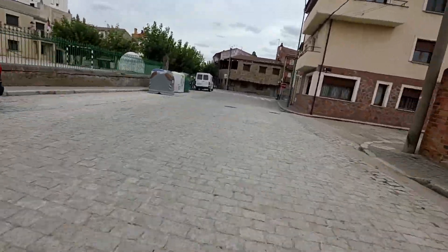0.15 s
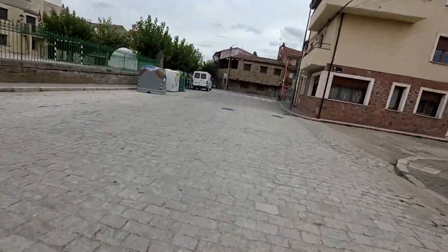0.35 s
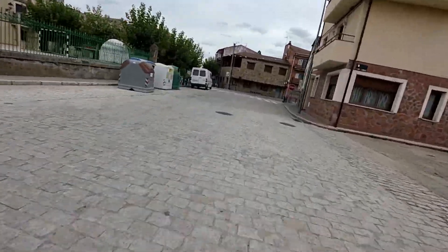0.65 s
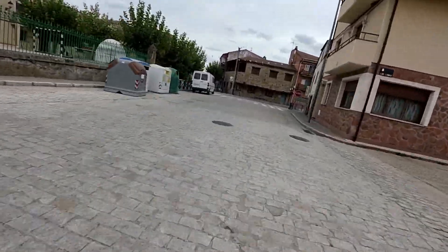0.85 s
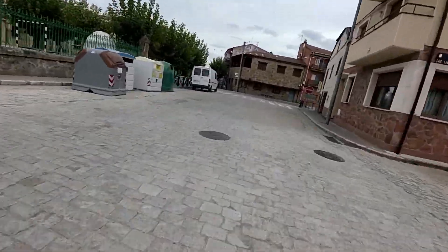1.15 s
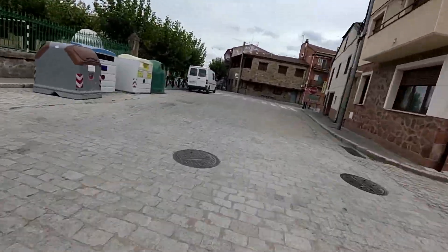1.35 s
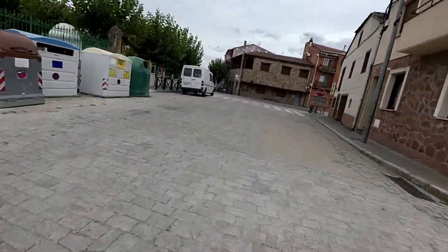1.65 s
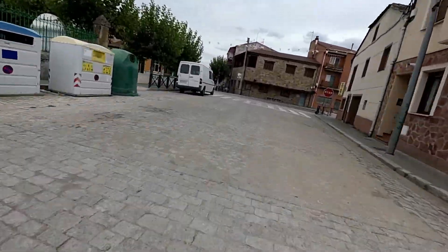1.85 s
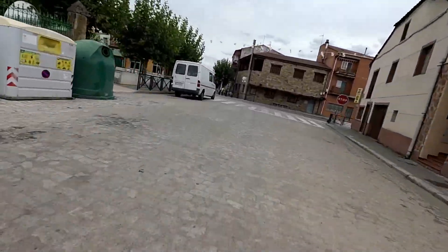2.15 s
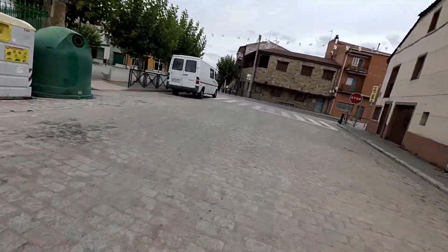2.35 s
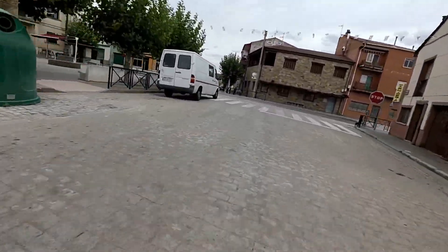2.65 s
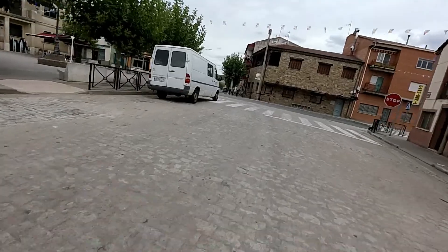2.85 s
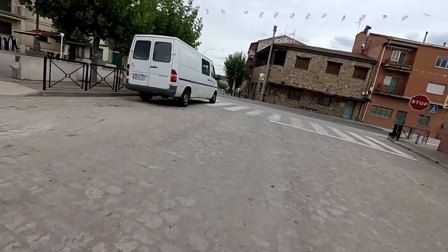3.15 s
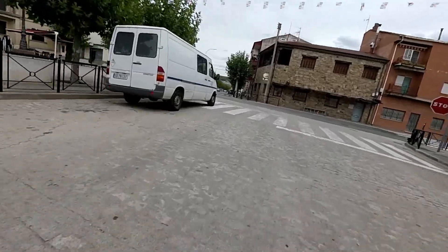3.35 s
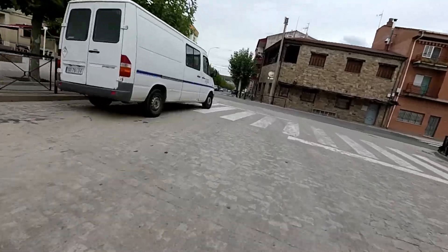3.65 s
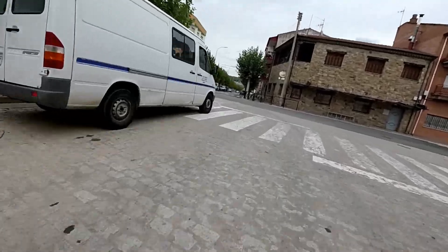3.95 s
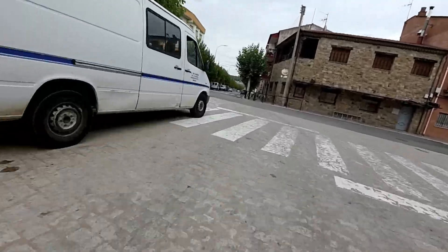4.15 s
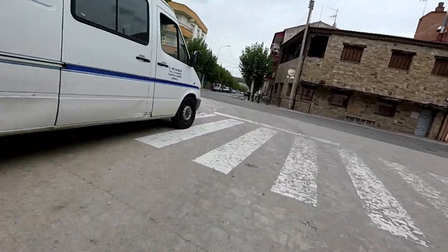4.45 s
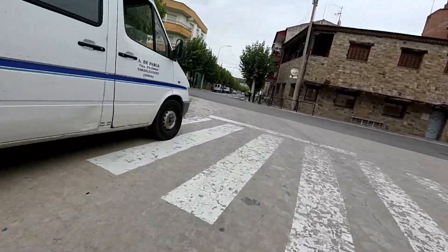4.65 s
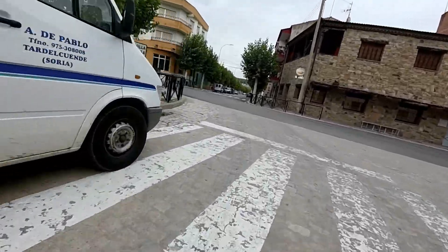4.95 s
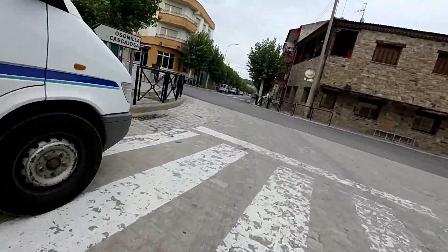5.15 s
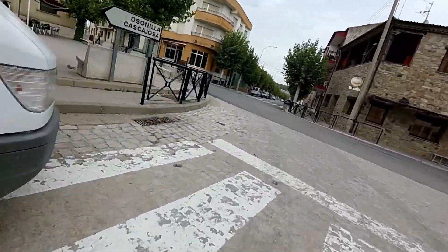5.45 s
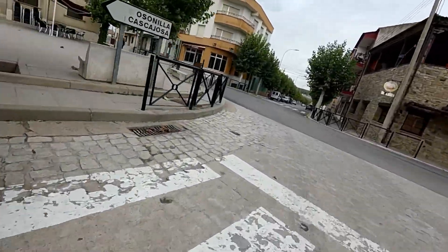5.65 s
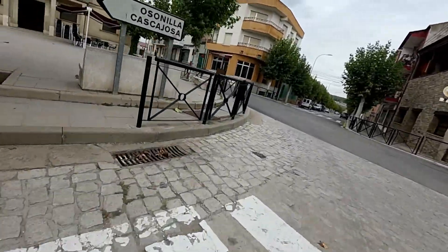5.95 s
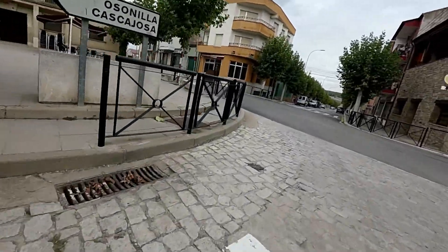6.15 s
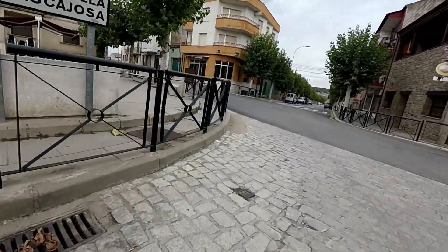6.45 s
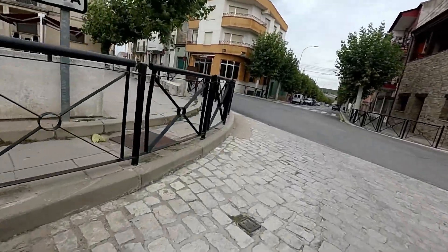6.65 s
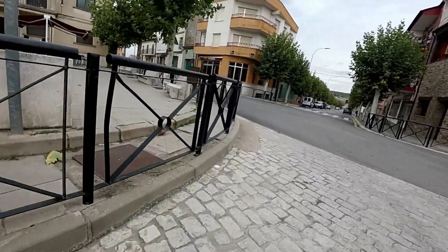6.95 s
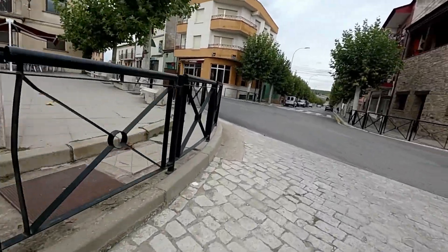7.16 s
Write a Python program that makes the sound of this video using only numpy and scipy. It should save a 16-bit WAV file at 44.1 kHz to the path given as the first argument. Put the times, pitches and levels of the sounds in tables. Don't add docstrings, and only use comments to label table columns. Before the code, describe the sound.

A bicycle rattles over cobblestones with wind rush, tyre hiss and freewheel clicking; hard knocks and a brief creak, then it slows and quietens.

```python
import sys
import numpy as np
from scipy import signal
from scipy.fft import rfft, irfft, next_fast_len
from scipy.io import wavfile
from scipy.ndimage import uniform_filter1d, map_coordinates

SR = 44100
rng = np.random.default_rng(int(sys.argv[2]) if len(sys.argv) > 2 else 0)


def natural_amplitude(level_db):
    exponent = np.asarray(level_db, float) / 20
    return 10 ** exponent


def int16_out(signal):
    q = np.round(np.clip(np.atleast_2d(signal).T, -1, 1) * 32767)
    wavfile.write(sys.argv[1], SR, q.astype(np.int16))


N = 322017

# pitch in Hz, width in Hz, level in dB.
TUBES = [(265.6, 36.8, 2), (319.6, 39.7, 0.5), (383.4, 53, -9), (449, 30, -13), (640, 70, -14)]


def unit(x):
    return x / np.sqrt(np.mean(x ** 2) + 1e-20)


def curves(rows):
    s, *cols = np.transpose(rows)
    return [np.interp(np.arange(N) / SR, s, c) for c in cols]


def swells(rows, half_s):
    s, *cols = np.transpose(rows)
    t = np.arange(0, N, 128) / SR
    bells = np.exp(-((t[:, None] - s) / half_s) ** 2 / 2)
    return [np.interp(np.arange(N) / SR, t, bells @ height) for height in cols]


def wobble(rate):
    return map_coordinates(rng.standard_normal(int(N * rate / SR) + 4), [np.arange(N) * rate / SR])


def filtered(x, response):
    m = next_fast_len(len(x) + min(len(x), 8192))
    return irfft(rfft(x, m) * response(np.fft.rfftfreq(m, 1 / SR)), m)[:len(x)]


def modes(table):
    def response(f):
        total = 0
        for k, (hz, width, db) in enumerate(table):
            total = total + (-1) ** k * natural_amplitude(db) * 1j * f * width / (hz * hz - f * f + 1j * f * width)
        return total
    return response


def damped(corner_hz, order):
    return lambda f: (1 + 1j * f / corner_hz) ** -order


def colour(points):
    hz, db = np.transpose(points)
    return lambda f: natural_amplitude(np.interp(np.log(f + 1), np.log(hz + 1), db))


def contacts(passed, scatter_db, rise_s, decay_s):
    starts = np.diff(np.floor(passed), prepend=0) * natural_amplitude(scatter_db * rng.standard_normal(N))
    t = np.arange(SR // 8) / SR
    pulse = np.exp(-t / decay_s) * (1 - np.exp(-t / rise_s))
    return unit(signal.fftconvolve(starts, pulse)[:N])


def ringing(drive, body, wide, steady_s):
    x = filtered(drive * rng.standard_normal(N), lambda f: modes(body)(f) * modes([wide])(f))
    loudness = np.sqrt(abs(uniform_filter1d(x ** 2, int(steady_s * SR))) + 1e-12)
    return unit(x / loudness ** 0.8)


def frame_rumble(jolts, slow_db):
    # pitch in Hz, width in Hz, level in dB.
    fork_body = [(68.85, 6.9, 0)]
    seat_body = [(93.3, 12, 11.5), (139, 190, -4)]
    stem_body = [(192.6, 26.3, 0)]
    # time in seconds, fork dB, seat dB.
    humps = [(0.0, 11.5, -3), (.14, -3, 6), (.26, 4.5, -7), (.95, -6, -2), (1.05, 7, -15), (1.16, 4.5, 2),
             (1.32, -6, 9), (1.42, 10, -3), (1.49, -8, 8), (1.66, 11.5, -1), (1.79, -4, 5), (1.93, 5, 0),
             (2.34, 5.5, 3), (2.56, 3.5, 4), (2.68, -14, -1), (2.77, 11.5, -3), (2.87, -13, 5),
             (3.78, 3, -5), (4.06, -10, 4), (4.14, 6.5, -3), (4.45, 5.5, 1), (4.56, 5, -1), (4.62, -9, 0),
             (6.16, 4, -3), (5.4, -10, 7), (5.59, -9, -2), (5.67, 5, -6), (6.49, 6, 0), (6.58, -16, 0),
             (6.82, 12.5, 4)]
    # time in seconds, tubes dB, stem dB.
    stone_edges = [(.02, 1.5, 3.5), (3.41, 0, 7), (.44, 3, 5), (.96, 3.5, 6.5), (1.05, 3.5, 6),
                   (1.16, -10, 6.5), (1.28, 4, -7), (1.48, -2, 8), (1.54, -2, -1), (1.66, 4, 3),
                   (1.79, 1, 5), (2.0, -1.5, -6), (2.18, 2, 9.5), (2.23, -1.5, -4), (2.48, 4, 0),
                   (2.62, -6, 0), (2.69, 4, -8), (3.05, 3, -4), (3.76, 4, 0), (4.0, 6.5, -0.5),
                   (4.13, -4, -9), (4.28, 1.5, 4), (4.63, 5.5, -6.5), (4.95, 4, -0.5), (5.37, -4, -1),
                   (5.43, 7, -5), (5.68, 4.5, 2.5), (6.0, 5, -4), (6.49, 4, -3), (6.89, 2.5, 12)]
    fork_db, seat_db = swells(humps, half_s=0.032)
    tubes_db, stem_db = swells(stone_edges, half_s=0.029)
    fork_db = -27 + 1.08 * slow_db + fork_db + 0.61 * wobble(12)
    seat_db = -35 + 2.06 * slow_db + seat_db + 3 * wobble(13)
    stem_db = -28 + 1.52 * slow_db + stem_db + 2.08 * wobble(15)
    tubes_db = -24 + 1.44 * slow_db + tubes_db + 0.67 * wobble(15)
    fork = natural_amplitude(fork_db) * ringing(1, fork_body, (68, 45, 0), 0.1)
    seat = natural_amplitude(seat_db) * ringing(1, seat_body, (120, 100, 0), 0.089)
    stem = natural_amplitude(stem_db) * ringing(1 + 0.12 * jolts, stem_body, (195, 120, 0), 0.078)
    tubes = natural_amplitude(tubes_db) * ringing(1 + 0.32 * jolts, TUBES, (320, 260, 0), 0.094)
    return filtered(fork + seat + stem + tubes, damped(1190, order=3)) * natural_amplitude(0.08)


def passing(slow_db):
    # time in seconds, half length in seconds, change
    # in dB.
    rush_swells = [(.1, .018, 3.5), (.39, .018, 4), (1.04, .04, 3), (1.42, .018, 4), (1.8, .2, 1.5),
                   (2.29, .015, 4), (2.71, .015, 9), (2.97, .06, -3), (3.11, .018, 5), (3.88, .02, 2.5),
                   (4.2, .12, -2.5), (4.86, .018, 4), (6.2, .1, 1.5)]
    # time in seconds, half length in seconds.
    skip = (2.62, 0.059)
    # time in seconds, half length in seconds, cavity dB, tyre dB.
    walls = [
        (.5, .2, 3.5, 1),
        (1.35, .2, -1.5, -1),
        (4.6, 0.27, 4, 1.5),
        (5.2, .2, 2.5, 1.5),
        (5.65, .15, 0, 2),
        (6.1, .3, 1.5, 0),
    ]
    swell_db, = swells(np.delete(rush_swells, 1, axis=1), np.transpose(rush_swells)[1])
    lull, = swells([(skip[0], 1)], skip[1])
    hollow_db, hiss_db = swells(np.delete(walls, 1, axis=1), np.transpose(walls)[1])
    wind_db = -30.5 + 1.28 * slow_db + swell_db - 3 * lull
    cavity_db = -41 + 0.089 * slow_db - 3 * lull + hollow_db
    tyre_db = -44.5 + 0.14 * slow_db - 2.6 * lull + hiss_db
    hub_db = -49.5 + 0.19 * slow_db - 4 * lull - 0.6 * hollow_db + 0.4 * swell_db
    return wind_db, cavity_db, tyre_db, hub_db


def freewheel(teeth):
    # pitch in Hz, width in Hz, level in dB.
    hub_bodies = [
        [(2430, 270, -4.5), (2770, 1050, -5.5)],
        [(3740, 700, 0.5), (4800, 380, 5.5), (7150, 640, -2.5), (10000, 500, -8), (11600, 500, -24)],
    ]
    parts = []
    for body in hub_bodies:
        clicks = contacts(teeth, scatter_db=2.5, rise_s=0.0012, decay_s=0.0055) * rng.standard_normal(N)
        rung = filtered(filtered(clicks, modes(body)), damped(8000, order=4))
        parts.append(unit(rung))
    flange, ring = parts
    return natural_amplitude(-1) * flange + ring


def rush(jolts, teeth, slow_db):
    # pitch in Hz, level in dB per Hz.
    wind_colour = [(15, -23), (30, -15), (45, -7), (150, -13), (400, -7.5), (500, -13.5), (650, -13),
                   (850, -16), (1150, -15.5), (1700, -26), (2100, -32), (2800, -43), (4400, -120)]
    hiss_colour = [(4000, -43), (6000, 1), (8600, -8.5), (9200, -10), (10000, -6.5), (10800, -10.5),
                   (11800, -9.5), (13000, -13), (15200, -14)]
    # pitch in Hz, width in Hz, level in dB.
    cavity_body = [(1353, 144, -1.5), (1477, 153, 1)]
    housing_body = [(2083, 1140, -5), (3390, 1530, -4), (3960, 227, 3.5), (4560, 490, -3), (5700, 1300, -7),
                    (7260, 300, -6), (8130, 280, -12.5)]
    wind_db, cavity_db, tyre_db, hub_db = passing(slow_db)
    gust = (1 + 0.079 * jolts) * natural_amplitude(0.67 * wobble(10))
    wind = natural_amplitude(wind_db) * unit(filtered(gust * rng.standard_normal(N), colour(wind_colour)))
    blown = filtered((1 + 0.19 * jolts) * rng.standard_normal(N), modes(cavity_body))
    cavity = natural_amplitude(cavity_db) * unit(filtered(blown, damped(3000, order=3)))
    shake = (1 + 0.095 * jolts) * natural_amplitude(0.91 * wobble(11))
    shaken = filtered(shake * rng.standard_normal(N), modes(housing_body))
    tyres = natural_amplitude(tyre_db) * unit(filtered(shaken, damped(11000, order=4)))
    floor = natural_amplitude(-59.5) * unit(filtered(rng.standard_normal(N), colour(hiss_colour)))
    return wind + cavity + tyres + natural_amplitude(hub_db) * freewheel(teeth) + floor


def burst(t60, tilt_db, body, chatter=0):
    t = np.arange(SR // 16) / SR
    rebounds = 7 * (np.arange(len(t)) % round(SR / 755) == 0)
    share = np.clip(chatter, 0, 1)
    rise_s = 0.00021 + 0.001 * share
    grain = (1 - share) * rng.standard_normal(len(t)) + share * rebounds
    hit = natural_amplitude(-60 * t / t60) * (1 - np.exp(-t / rise_s)) * grain
    tilt = lambda f: (1 + 1j * f / 1200) ** (tilt_db / 6)
    x = filtered(hit, lambda f: body(f) * tilt(f) * damped(11000, order=4)(f))
    return x / abs(x).max()


def ticks():
    # time in seconds, ping peak in dB, tap on the body in dB.
    tick_times = [(0.3054, -52, -44), (0.4085, -45, -35), (0.6144, -52, -34), (0.7043, -38, -30),
                  (0.7454, -50.5, -31), (0.7821, -44, -31), (0.8954, -51, -41), (0.9123, -44, -39),
                  (1.3444, -53, -31), (1.481, -51, -35), (1.552, -46, -24.5), (1.6053, -43, -44),
                  (1.674, -51, -32), (1.8604, -53, -32), (1.8911, -46, -37), (2.0064, -53, -35),
                  (2.0916, -52, -30), (3.3844, -53, -38), (3.4784, -54, -30), (3.5169, -46, -41),
                  (3.6601, -43, -41), (3.6965, -52, -42), (3.7544, -50, -45), (3.9294, -55, -38),
                  (3.9984, -51, -39), (4.6244, -53, -37), (4.7884, -54, -37), (5.3138, -52, -38),
                  (5.5175, -50, -30), (5.801, -55, -33)]
    bright = lambda f: modes([(10000, 900, 0), (11600, 1000, 3)])(f) * modes([(11000, 5000, 0)])(f)
    dull = modes([(2700, 2000, 4), (4250, 1700, 4), (6800, 1600, 1.5)])
    out = np.zeros(N + SR)
    for s, db, body_db in tick_times:
        ping = natural_amplitude(db) * burst(0.0054, 0, bright)
        tap = natural_amplitude(body_db + 4) * burst(0.015, -4, dull)
        out[round(s * SR):][:len(tap)] += ping + tap
    return out[:N]


def thump(push_s, t60):
    t = np.arange(SR // 16) / SR
    push = np.sin(np.pi * np.minimum(t / push_s, 1))
    x = filtered(push, modes(TUBES)) * natural_amplitude(-60 * t / t60)
    return x / abs(x).max()


def knocks():
    # pitch in Hz, width in Hz, level in dB.
    shell = [(334, 190, 4), (686, 700, 1), (1414, 370, 8.5), (2230, 530, 3.5), (3500, 1080, 0.5),
             (4660, 500, 0.5), (5300, 480, -6.5), (7350, 1500, -10.5), (10200, 660, -16)]
    # time in seconds, peak in dB, thud in dB, brightness in dB per octave, length in seconds.
    blows = [(0.378, -29, -1, 5, 0.015), (2.267, -23.5, 13, 5, 0.0035), (2.28, 1.5, -5.5, 2.5, .0105),
             (2.2885, -14, 4, -1, .009), (2.4572, -20, -3, 1.5, 0.011), (2.469, -12.5, -14, 9.5, 0.0031),
             (2.509, -14, 1.5, 3, 0.011), (2.686, -32, -3, 4, 0.0089), (2.6972, -15, 7, -5, .006),
             (2.7095, -11, -4, -3, .008), (2.732, -30, 1, 8, 0.005), (2.76, -24, 0, 0, .01),
             (2.775, -27, -8, 2, .012), (2.785, -33, -8, 4, 0.013), (2.812, -26, -14, 2, 0.0082),
             (3.091, -33, 9, -2, 0.0092), (3.115, -23, -5, -12, .008), (3.209, -13, -14, -7, .008),
             (3.238, -28, 2, -1, .01), (5.022, -25, -13, -2, 0.01), (5.473, -22, -15, -4, 0.005),
             (5.8, -29, -6, -4, .006)]
    out = np.zeros(N + SR)
    for s, db, thud_db, tilt_db, length in blows:
        chatter = -0.03 * (db + 16)
        crack = natural_amplitude(db) * burst(max(length, 0.002) * 2, tilt_db, modes(shell), chatter)
        thud = natural_amplitude(db + thud_db - 1.5) * thump(push_s=0.0012, t60=0.05)
        out[round(s * SR):][:len(crack)] += crack + thud
    return out[:N]


def creak():
    # time in seconds, slips per second, load in dB.
    grip = [
        (2.325, 320, -52),
        (2.346, 304, -40),
        (2.357, 299, -29),
        (2.367, 297, -26.5),
        (2.376, 305, -27),
        (2.385, 319, -29),
        (2.394, 326, -29),
        (2.4, 360, -35),
        (2.408, 332, -52),
    ]
    # pitch in Hz, width in Hz, level in dB.
    clamp_bodies = [
        [(890, 450, -7), (1730, 240, -2), (2460, 390, 2), (3000, 500, -6)],
        [(3730, 310, 10), (4600, 370, 7.5), (5400, 550, 5.5), (7140, 900, -9), (9000, 900, -18)],
    ]
    rate, load_db = curves(grip)
    t = np.arange(N) / SR
    late_db = np.interp(t - 0.006, t, load_db) - 4.5
    on = np.clip(np.minimum(t - grip[0][0], grip[-1][0] - t) / 0.015, 0, 1)
    turns = np.cumsum(rate * (1 + 0.008 * wobble(150))) / SR
    slips = contacts(turns, scatter_db=0.5, rise_s=0.0001, decay_s=0.00006)
    slips = slips + 0.23 * rng.standard_normal(N)
    slips = filtered(slips, lambda f: np.exp(-1j * (f / 1100) ** 2))
    out = 0
    for db, body in zip((load_db, late_db), clamp_bodies):
        out = out + natural_amplitude(db) * unit(filtered(filtered(slips, modes(body)), damped(7400, order=3)))
    return on * out


def bird():
    # time in seconds, pitch in Hz, level in dB.
    chirps = [
        (5.63, 12300, -66),
        (5.965, 12300, -62),
    ]
    out = np.zeros(N)
    for s, hz, db in chirps:
        t = np.arange(N) / SR - s
        out += natural_amplitude(db) * np.exp(-(t / 0.006) ** 2) * np.sin(2 * np.pi * (hz - 9000 * t) * t)
    return out


def scene():
    # time in seconds, ratchet teeth passed.
    rolled = [(0, 0), (.577, 34), (1.033, 60), (1.433, 82), (1.783, 101), (2.091, 116), (2.412, 133),
              (2.791, 152), (3.39, 182), (3.799, 201), (4.174, 218), (4.701, 239), (5.067, 252),
              (5.349, 261), (5.988, 279), (6.499, 291), (6.811, 297), (7.31, 305.6)]
    teeth, = curves(rolled)
    speed = uniform_filter1d(np.gradient(teeth) * SR, SR // 2, mode="nearest")
    slow_db = 20 * np.log10(speed / 58)
    stones = np.cumsum(np.gradient(teeth) * 0.8 * natural_amplitude(2.7 * wobble(13)))
    jolts = contacts(stones, scatter_db=5, rise_s=0.0041, decay_s=0.0075)
    rolling = frame_rumble(jolts, slow_db) + rush(jolts, teeth, slow_db)
    return (rolling + ticks() + knocks() + creak() + bird())[None]


def roll_off(x):
    return signal.sosfilt(signal.butter(12, 15600, fs=SR, output="sos"), x)


def record(dry):
    heard = filtered(np.clip(dry[0], -1, 1), lambda f: f < 15290)
    return roll_off(np.clip(heard, -1, 1)[None])


dry = scene()
out = record(dry)
int16_out(out)
```